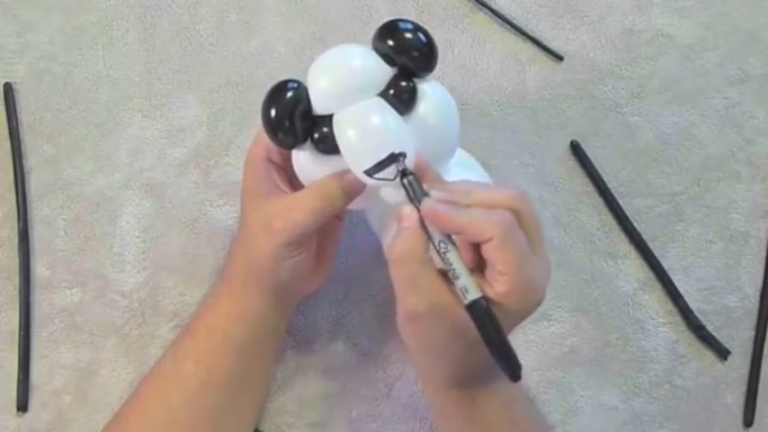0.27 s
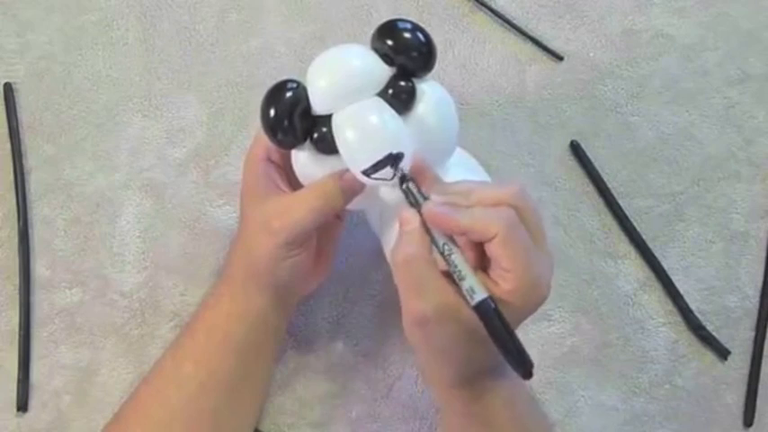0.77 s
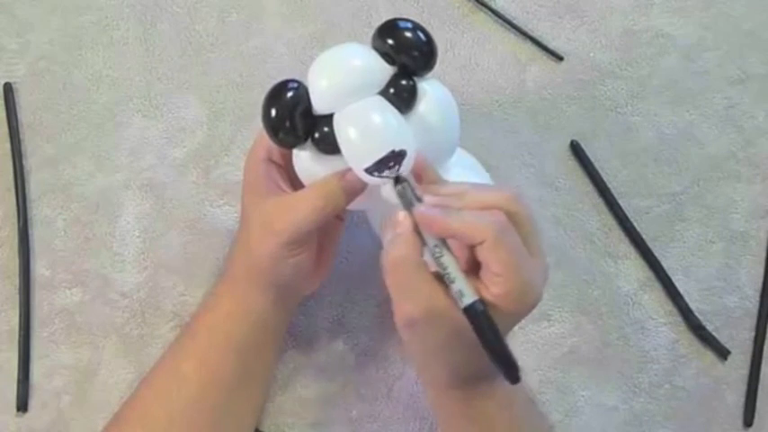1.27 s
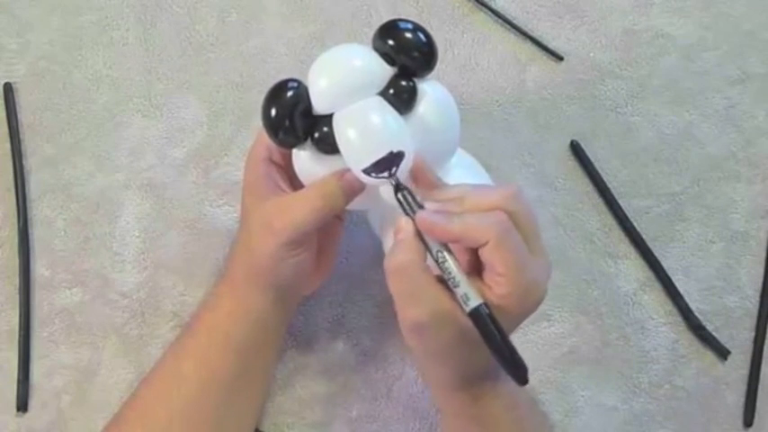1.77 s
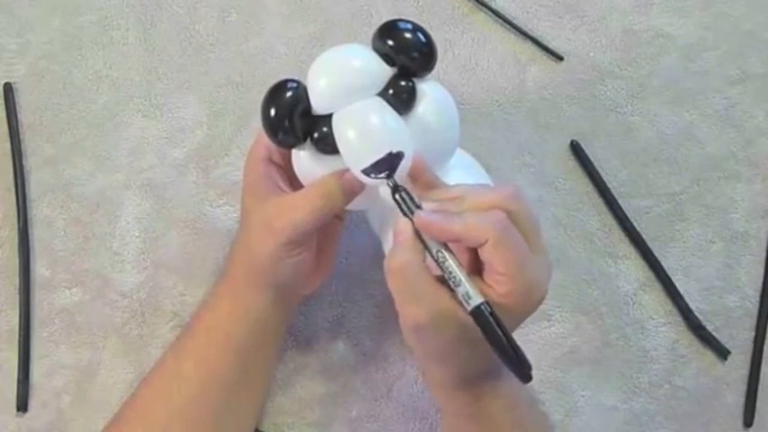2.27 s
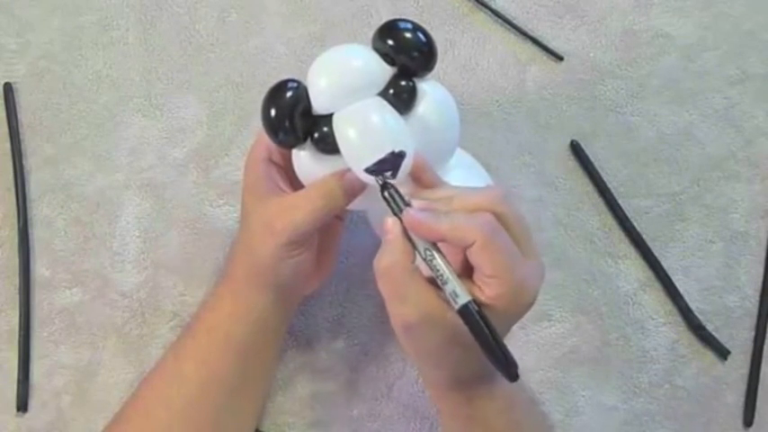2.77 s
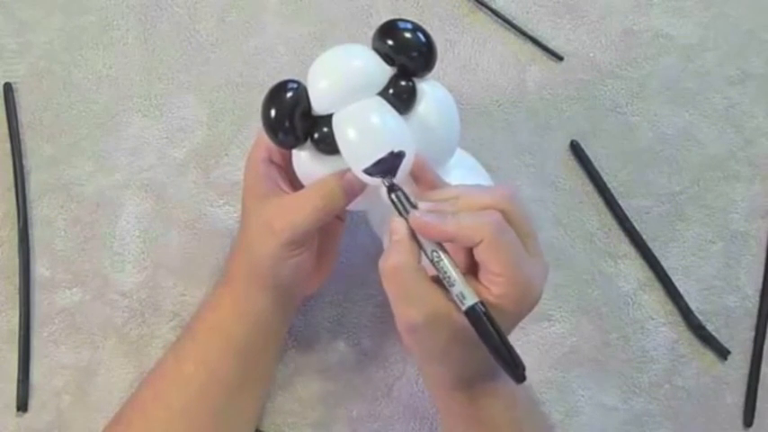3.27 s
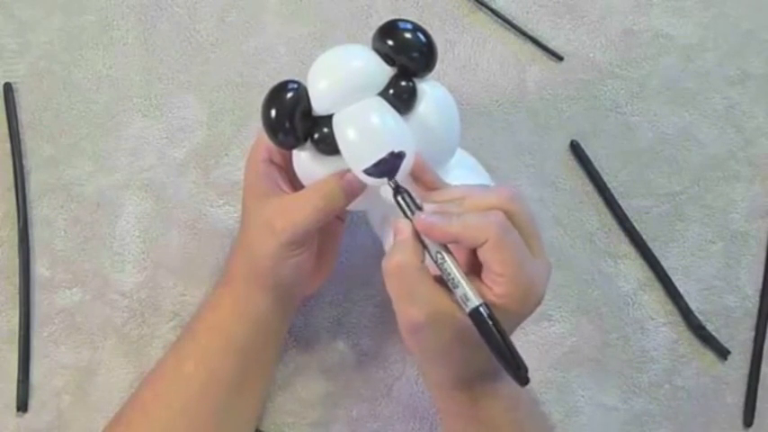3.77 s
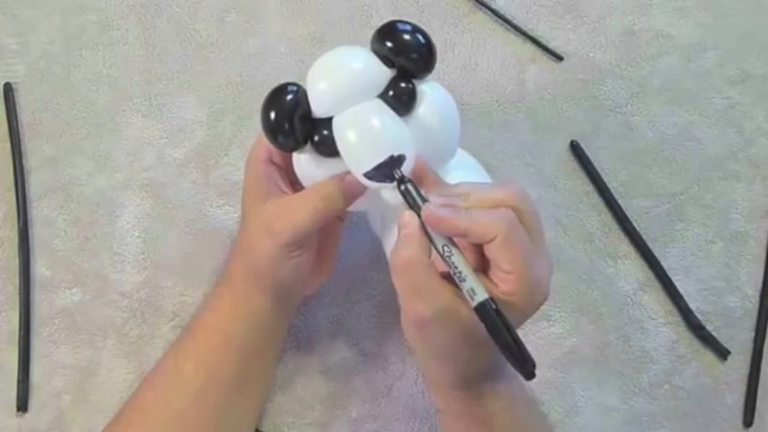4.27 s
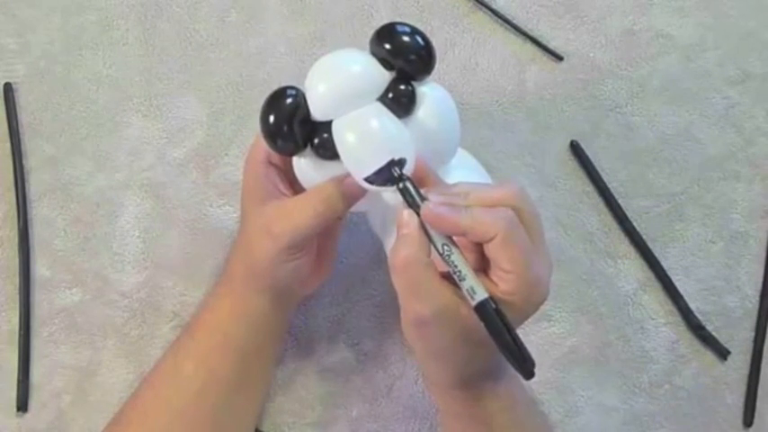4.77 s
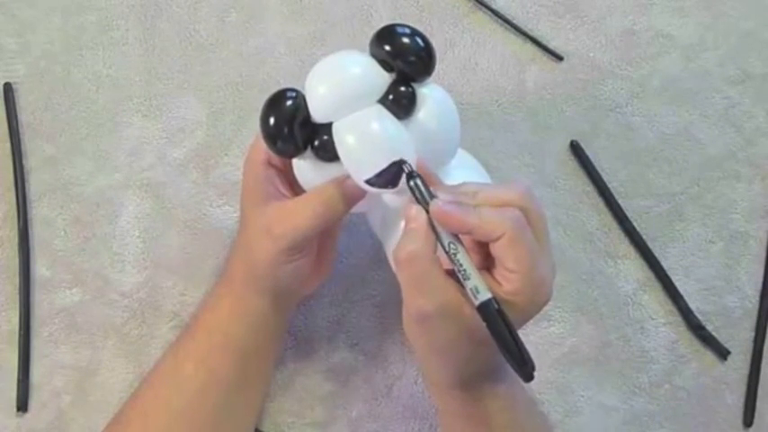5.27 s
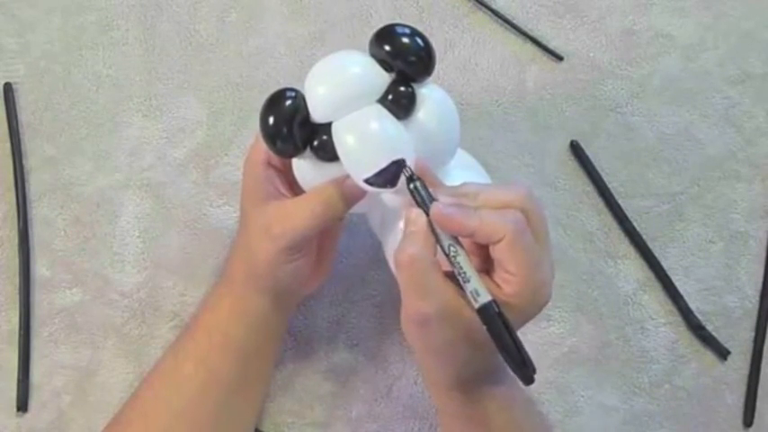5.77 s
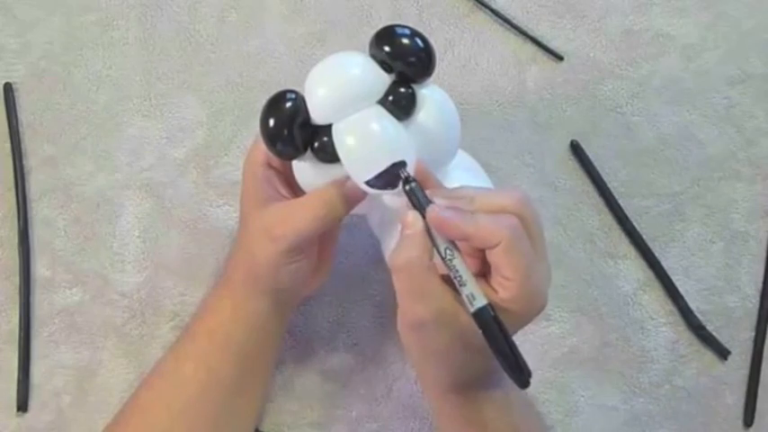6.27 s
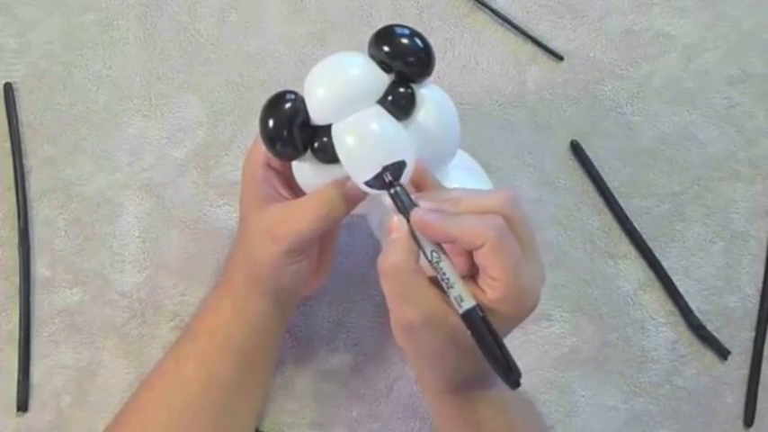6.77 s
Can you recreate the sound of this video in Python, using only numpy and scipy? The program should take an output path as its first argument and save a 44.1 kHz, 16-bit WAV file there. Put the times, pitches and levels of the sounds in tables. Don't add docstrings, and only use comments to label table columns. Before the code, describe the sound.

A marker's felt tip rubs a taut latex balloon close to the microphone, in a small room with steady soft hiss. From 0 to 0.4 s one hollow squeak rises and fades, then another sinks and breaks into a rough, lower creak. Between 0.45 and 2.1 s quick bright squeaks come in irregular bunches, each about a tenth of a second, arching up and down in pitch, often preceded by a lower chattering catch; the loudest are near 1.3, 1.8 and 2 s. From 2.2 to 3.4 s strokes are duller and hoarser, with short pauses and a swell near 2.87. Around 3.6 s a slow squeak bends up and back; near 4 s a low groan climbs. Knocks and snaps cluster at 4.4-4.85 s with faint dabs. Until about 7 s there are only light, whispery scuffs, thin clicks and dull finger pats, most frequent after 5.9 s.

```python
import sys
import numpy as np
from scipy import signal
from scipy.fft import rfft, irfft, next_fast_len
from scipy.io import wavfile
from scipy.ndimage import uniform_filter1d, map_coordinates

SR = 44100
rng = np.random.default_rng(int(sys.argv[2]) if len(sys.argv) > 2 else 0)


def gain_from_db(level_db):
    decades = np.asarray(level_db, float) / 20
    return 10 ** decades


def put_to_file(sound):
    columns = np.atleast_2d(sound).T
    safe = np.clip(columns, -1, 1)
    whole_steps = np.round(safe * 32767)
    wavfile.write(sys.argv[1], SR, whole_steps.astype(np.int16))


N = 309096

# freq_hz, density_db
HISS_SPECTRUM = [(31, -32), (52, -10.5), (64, -14), (126, -7), (263, -8.5), (339, -9), (527, -13),
                 (598, -11), (786, -17), (5340, -31), (6460, -31), (7970, -41), (10400, -84.5),
                 (17500, -120)]
# freq_hz, t60_s
ROOM_DECAY = [(300, 0.3), (800, 0.23), (2100, 0.28), (5500, 0.24)]
# freq_hz, t60_s
NEARBY_DECAY = [(500, 0.051), (5000, 0.011)]
# freq_hz, gain_db
CAMERA_EDGE = [(6800, 3), (7400, -6), (7800, -16), (8200, -51), (8500, -90)]

# freq_hz, width_hz, level_db
BODY_MODES = [(1042, 77, 3), (1236, 147, -1), (1396, 86, 0.5), (1570, 515, -4)]
# freq_hz, width_hz, level_db
PATCH_MODES = [(1920, 192, -7.5), (2269, 110, -6.5), (3090, 550, 3.5), (3455, 420, 2.5), (4044, 473, 2),
               (4710, 790, -2.5), (6440, 5200, -15)]
# freq_hz, width_hz, level_db
AIR_MODES = [(400, 90, -4), (580, 113, -6.5), (705, 150, 1), (876, 179, 2)]
# freq_hz, width_hz, level_db
FREE_MODES = [(400, 45, -5), (733, 102, -5.5), (858, 67, -1.5), (1100, 100, -3.5), (1490, 430, -14)]

# start_s, peak_db
SNAP_TIMES = [(.1216, -39), (4.592, -31), (4.626, -23.5), (4.6436, -38), (5.6162, -28.5), (5.7805, -34.5),
              (5.9638, -35), (5.9785, -28.5), (6.0497, -27.5), (6.1078, -27), (6.6404, -34),
              (6.6985, -27.5), (6.7351, -34), (6.897, -29.5), (6.9354, -28.5), (6.981, -29)]
# start_s, peak_db
KNOCK_TIMES = [(1.083, -31), (1.094, -31), (3.8548, -29), (3.8823, -29.5), (4.372, -25), (4.5686, -23),
               (4.7132, -21), (4.8479, -27), (5.3864, -35.5), (6.1455, -35), (6.521, -35)]
# start_s, peak_db
PAT_TIMES = [(2.755, -45), (4.489, -60), (5.0542, -44.5), (5.2954, -46), (5.3974, -50), (5.555, -53),
             (6.0897, -45), (6.1577, -43), (6.1724, -59), (6.1874, -53), (6.4321, -40.5), (6.5425, -60),
             (6.8148, -46), (6.8336, -40)]

# start_s, rise_s, fall_s, peak_db, top_slip_rate_hz
SCUFF_STROKES = [(4.895, .024, .02, -38.5, 214.3), (4.945, .035, .06, -38, 213.1),
                 (5.05, .008, .022, -41.5, 204.2), (5.088, .014, .075, -37, 195.1),
                 (5.175, 0.0088, .057, -40, 195.2), (5.9, 0.018, .034, -39.5, 615.2),
                 (5.955, .026, .016, -38.5, 286.3), (6.41, .075, .07, -40, 300),
                 (6.68, .025, .07, -46, 429.8), (6.765, .025, .04, -45.5, 370.1),
                 (6.835, 0.0099, .1, -44, 348.6), (6.955, 0.032, 0.016, -54, 278)]
# start_s, rise_s, fall_s, peak_db, top_slip_rate_hz
SQUEAK_STROKES = [
    (.692, .052, .032, -23.5, 684.7),
    (.902, .027, .05, -25, 727.4),
    (.94, 0.034, 0.054, -22, 683),
    (1.257, 0.029, 0.053, -21, 696.6),
    (1.473, .04, .035, -24, 655.6),
    (1.572, 0.043, 0.046, -26, 657),
]
# start_s, rise_s, fall_s, peak_db, top_slip_rate_hz
FLICK_STROKES = [
    (.462, .021, .05, -22.5, 735),
    (.818, 0.019, 0.028, -22.5, 730),
    (1.81, .028, .04, -21, 722.6),
    (2.023, .021, 0.051, -21, 669),
]
# start_s, rise_s, fall_s, peak_db, top_slip_rate_hz
DAB_STROKES = [
    (2.237, .004, .022, -28, 263),
    (2.638, .025, .065, -32, 376),
    (4.68, .004, .07, -36, 290),
    (4.847, .008, .03, -38, 280),
]
# start_s, rise_s, fall_s, peak_db, top_slip_rate_hz
SLIDE_STROKES = [
    (.485, .006, .05, -26, 580),
    (.568, 0.0079, .06, -25, 708.7),
    (.596, .008, 0.059, -30, 625.2),
    (.855, .018, .014, -34.5, 689.5),
    (1.855, .008, .035, -31, 710),
    (1.721, .008, .035, -24, 600),
]
# start_s, rise_s, fall_s, peak_db, top_slip_rate_hz
CHATTER_STROKES = [(.443, .018, .04, -29, 560), (1.099, .014, .075, -30, 365), (1.224, .031, .05, -24, 493),
                   (1.345, 0.017, .045, -34, 199.1), (1.442, 0.029, .05, -24, 495.5),
                   (1.627, .008, .025, -29, 400), (1.69, 0.027, .05, -22.5, 483),
                   (1.942, 0.0072, .015, -33, 219.5), (1.999, 0.022, .05, -23.5, 473),
                   (3.095, .013, .04, -27.5, 475.6), (3.115, 0.038, .035, -27, 403),
                   (3.895, 0.033, .04, -29.5, 168.2), (6.002, .018, .05, -39, 284.7)]

# time_s, slip_rate_hz, level_db, irregularity (0-1)
LONG_DRAGS = [
    [(0.0, 598, -28, 0.43), (.021, 659, -28, 0.05), (.04, 698, -27, 0.39), (.055, 679, -37, 0.73),
     (.105, 662.5, -46, 1)],
    [(.12, 610, -33.5, .9), (.142, 605, -31.5, .35), (.197, 562, -29.5, .28), (.208, 588.6, -28.5, 0.2),
     (.24, 554.4, -29, .3)],
    [(.24, 539.7, -30, .4), (.26, 442, -29, .4), (.293, 436.8, -32.5, .5), (.297, 306, -32, .4),
     (.345, 312, -35, .5), (.375, 323, -43, .7)],
]
# time_s, slip_rate_hz, level_db, irregularity (0-1)
MIDDLE_DRAGS = [
    [(2.293, 400, -29, 0.61), (2.308, 551, -31, .3), (2.338, 562, -29.5, .8), (2.342, 627, -32, .7),
     (2.378, 671, -33.5, .3), (2.398, 638, -32.5, .3), (2.412, 283.4, -32.5, .4), (2.445, 410.3, -34, .6),
     (2.5, 372, -36.5, .8)],
    [(2.765, 321, -38, .9), (2.787, 382.4, -32.5, .7), (2.803, 594.7, -31.5, .4),
     (2.842, 556.6, -30.5, .22), (2.866, 598, -24, .3), (2.884, 556, -24.5, .7), (2.889, 380.3, -28.5, .9),
     (2.93, 374.5, -46.5, .9)],
    [(2.997, 410.4, -31.5, .7), (3.014, 649.5, -31.5, .5), (3.03, 420.2, -33.5, .6), (3.07, 400, -47.5, .9)],
    [(3.2, 269.7, -32.5, .6), (3.236, 334, -32, .8), (3.269, 373.8, -30, .5), (3.273, 583.3, -28.5, .55),
     (3.313, 607.7, -30, .65), (3.318, 376.9, -32.5, .7), (3.385, 353, -41.5, .8)],
]
# time_s, slip_rate_hz, level_db, irregularity (0-1)
SLOW_DRAGS = [
    [(3.58, 291.3, -29.5, .4), (3.607, 356.3, -35.5, .2), (3.632, 489.6, -29.5, .2),
     (3.664, 350.4, -35, .6), (3.716, 280.6, -35.5, .8), (3.735, 274, -50, .6)],
    [(3.975, 105.1, -39, .4), (4.02, 175.1, -31.5, .2), (4.063, 331, -28.5, .3), (4.102, 427.4, -28.5, .1),
     (4.123, 405, -31, .8), (4.159, 454, -33.5, .7), (4.22, 412, -58, .9)],
]
# sharpness_db, hollowness_db
DRAG_PLACES = [
    (-3, 5),
    (-1.5, 4),
    (-5, -2),
    (-8, -7),
    (-4.5, -4),
    (0.5, -3.5),
    (-4, -6),
    (-14, -7),
    (-9, -8),
]

# landing and lift-off rate (shares of top), landing_db, held_db, lift_off_db
SQUEAK_ARC, SLIDE_ARC = (0.89, 0.91, -4, -5, -19), (1.01, 0.92, -3, -5, -18)
CHATTER_ARC, SCUFF_ARC = (0.81, 0.93, -5, -4, -16.5), (1, 1.08, -8, -4, -18)
FLICK_ARC, DAB_ARC = (0.86, 0.8, -3, -4, -17), (0.85, 0.95, -2, -4, -18)
# irregularity (0-1), sharpness_db, hollowness_db
SQUEAK_TOUCH, SLIDE_TOUCH = (0.299, -5, -5.5), (0.33, -4, -3.5)
CHATTER_TOUCH, SCUFF_TOUCH = (0.45, -6, -8), (0.6, -17.5, -6)
FLICK_TOUCH, DAB_TOUCH = (0.3, -6.5, -9.5), (0.4, -14, -9)


def unit(x):
    return x / np.sqrt(np.mean(x ** 2) + 1e-20)


def along(points, hz):
    f, v = np.transpose(points)
    return np.interp(np.log(hz + 1), np.log(f + 1), v)


def filtered(x, response):
    m = next_fast_len(N + SR // 2)
    return irfft(rfft(x, m) * response(np.fft.rfftfreq(m, 1 / SR)), m)[..., :N]


def ringing(x, modes):
    def response(f):
        total = 0
        for k, (centre, width, db) in enumerate(modes):
            band = 1j * f * width
            total = total + (-1) ** k * gain_from_db(db) * band / (centre * centre - f * f + band)
        return total
    return filtered(x, response)


def impulses(seconds, sizes):
    at = np.asarray(seconds)[:, None] * SR
    taps = np.floor(at).astype(int) + np.arange(-7, 9)
    shape = np.sinc(taps - at) * np.cos(np.pi * (taps - at) / 16) ** 2
    weights = shape * np.asarray(sizes)[:, None]
    return np.bincount(np.clip(taps, 0, N).ravel(), weights.ravel(), N + 1)[:N]


def hiss():
    noise = filtered(rng.standard_normal(N), lambda hz: gain_from_db(along(HISS_SPECTRUM, hz)))
    return gain_from_db(-55) * unit(noise)


def echoes(x, decays, delay_s):
    out, hop = np.zeros(N + SR), SR // 4
    for start in range(0, N, hop):
        hz, t, z = signal.stft(rng.standard_normal(SR // 2), SR, nperseg=128)
        fade = gain_from_db(-60 * t / along(decays, hz)[:, None])
        tail = signal.istft(z * fade, SR, nperseg=128)[1]
        answer = signal.fftconvolve(x[start:start + hop], tail / np.linalg.norm(tail))
        out[start + round(delay_s * SR):][:len(answer)] += answer
    return out[:N]


def ticks(crack_db, thud_db):
    kinds = [(SNAP_TIMES, -10.5), (KNOCK_TIMES, -4), (PAT_TIMES, 7)]
    rows = [(s, db, low_db) for times, low_db in kinds for s, db in times]
    s, peak_db, low_db = np.transpose(rows)
    s = s + 0.001
    patch = [(3930, 4500, 0.011)]
    crack = ringing(ringing(impulses(s, -gain_from_db(peak_db + crack_db)), patch), patch)
    blow = impulses(s, -gain_from_db(peak_db + low_db + thud_db))
    return crack + ringing(blow, AIR_MODES + BODY_MODES)


def arcs(rows, arc, touch):
    first, last, land_db, held_db, off_db = arc
    grip, sharp_db, hollow_db = touch
    bite_s, bite_db = 0.004, -2
    held = 0.393
    strokes = []
    for s, rise, fall, db, hz in rows:
        bite = min(bite_s / rise, 0.5)
        at = s + np.array([0, bite * rise, rise, rise + held * fall, rise + fall])
        speed = np.array([first, first + (1 - first) * bite, 1, 1 - (1 - last) * held, last])
        under_db = np.array([land_db + bite_db, land_db * (1 - bite), 0, held_db, off_db])
        loose = grip - np.where(at < s + rise, 0.05, 0.04) * under_db
        points = list(zip(at, hz * speed, db + under_db, loose))
        strokes.append((points, (sharp_db, hollow_db, 1)))
    return strokes


def all_strokes():
    firm = [*arcs(SQUEAK_STROKES, SQUEAK_ARC, SQUEAK_TOUCH), *arcs(FLICK_STROKES, FLICK_ARC, FLICK_TOUCH),
            *arcs(DAB_STROKES, DAB_ARC, DAB_TOUCH), *arcs(SLIDE_STROKES, SLIDE_ARC, SLIDE_TOUCH),
            *arcs(CHATTER_STROKES, CHATTER_ARC, CHATTER_TOUCH)]
    for drag, place in zip(LONG_DRAGS + MIDDLE_DRAGS + SLOW_DRAGS, DRAG_PLACES):
        firm.append((drag, (*place, 0.3)))
    light = arcs(SCUFF_STROKES, SCUFF_ARC, SCUFF_TOUCH)
    strokes = [(*s, False) for s in firm] + [(*s, True) for s in light]
    return sorted(strokes, key=lambda stroke: stroke[0][0][0])


def hand():
    t = np.arange(N) / SR
    rate, loose, gain = np.full(N, 300.0), np.ones(N), np.zeros((5, N))
    for points, (sharp_db, hollow_db, share), light in all_strokes():
        s, rate_hz, level_db, grip = np.transpose(points)
        on = slice(*np.searchsorted(t, [s.min(), s.max()]))
        db = np.interp(t[on], s, level_db)
        under = share * (level_db.max() - db)
        late = (t[on] > s[level_db.argmax()]).astype(int)
        rate[on] = np.interp(t[on], s, rate_hz)
        loose[on] = np.interp(t[on], s, grip)
        patch = gain_from_db(db + sharp_db + np.take((-0.8, -0.3145), late) * under)
        air = gain_from_db(db + hollow_db + np.take((-0.5, 0.41), late) * under)
        off = 0 * db
        gain[:, on] = [off, off, off, gain_from_db(db), patch] if light else [gain_from_db(db), patch, air, off, off]
    return rate, np.clip(loose, 0.1, 1), uniform_filter1d(gain, size=60, axis=1)


def squeak(wander, jitter, scatter_db, rub_db, low_rub_db):
    t = np.arange(N) / SR
    rate, loose, (body, patch, air, free, light_patch) = hand()
    drift = map_coordinates(rng.standard_normal(700), [t * 90])
    rate = rate * np.exp(wander * loose * drift)
    turns = np.cumsum(rate) / SR
    at = np.interp(np.arange(1, int(turns[-1])), turns, t)
    chance = rng.standard_normal((6000, 2))[np.arange(len(at)) % 6000]
    here = (at * SR).astype(int)
    at = at + jitter * loose[here] ** 2 * chance[:, 0] / rate[here]
    size = gain_from_db(scatter_db * loose[here] * chance[:, 1]) / np.sqrt(rate[here])
    slips = unit(impulses(at, -size))
    felt = rng.standard_normal(N)
    groups = [(body, BODY_MODES, low_rub_db), (air, AIR_MODES, low_rub_db), (patch, PATCH_MODES, rub_db),
              (free, FREE_MODES, low_rub_db), (light_patch, [(2270, 520, 0)], low_rub_db)]
    out = 0
    for gain, modes, db in groups:
        rub = gain_from_db(db) * loose ** 2
        force = (slips + rub * felt) / np.sqrt(1 + rub ** 2)
        out = out + ringing(force * gain, modes) / np.std(ringing(force, modes))
    return out


def scene():
    tip = gain_from_db(-2.5) * squeak(wander=0.03, jitter=0.1, scatter_db=3.5, rub_db=0, low_rub_db=-10)
    taps = ticks(crack_db=11.5, thud_db=31)
    scatter = echoes(gain_from_db(-14) * tip + gain_from_db(-5) * taps, NEARBY_DECAY, delay_s=0.001)
    room = gain_from_db(-5.5) * echoes(tip + taps, ROOM_DECAY, delay_s=0.006)
    return (tip + taps + scatter + room + hiss())[None]


def roll_off(x):
    return signal.sosfilt(signal.butter(12, 8120, fs=SR, output="sos"), x)


def record(dry):
    mix = filtered(dry, lambda hz: gain_from_db(along(CAMERA_EDGE, hz)))
    mix = mix + 0.0153 + gain_from_db(-108.5) * rng.standard_normal(dry.shape)
    return roll_off(mix)


dry = scene()
out = record(dry)
put_to_file(out)
```